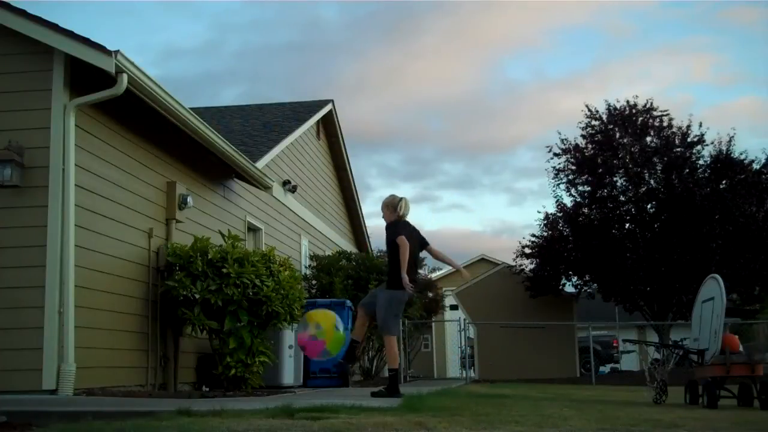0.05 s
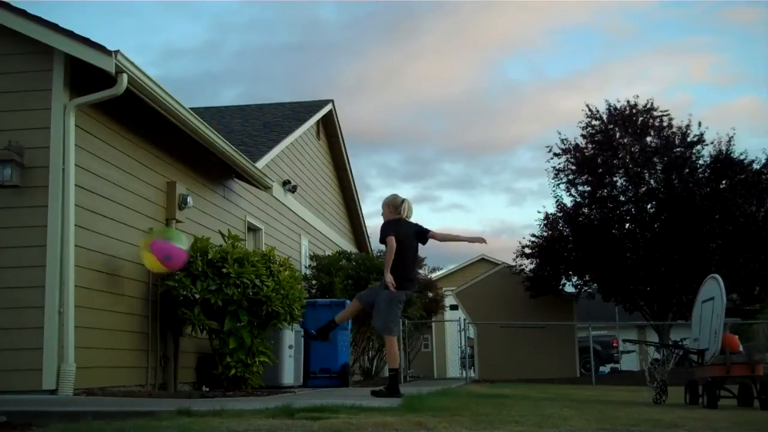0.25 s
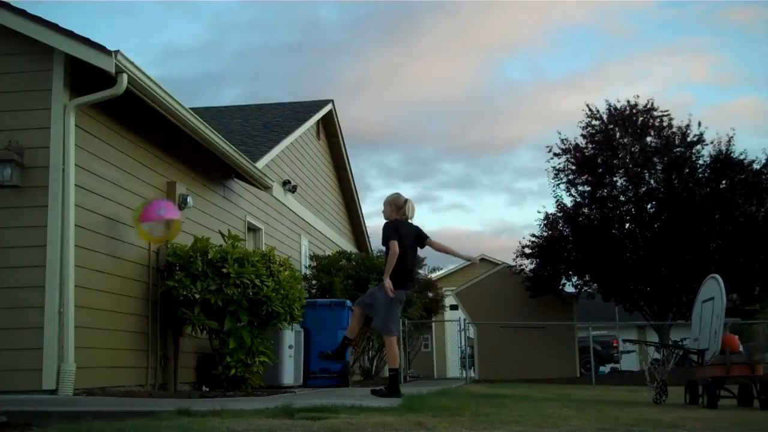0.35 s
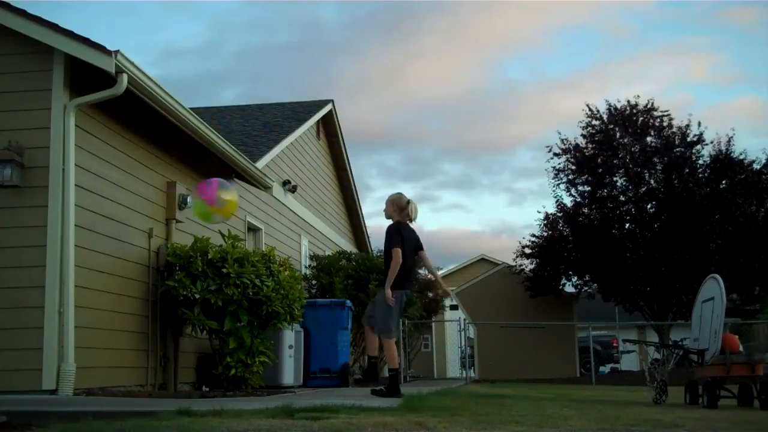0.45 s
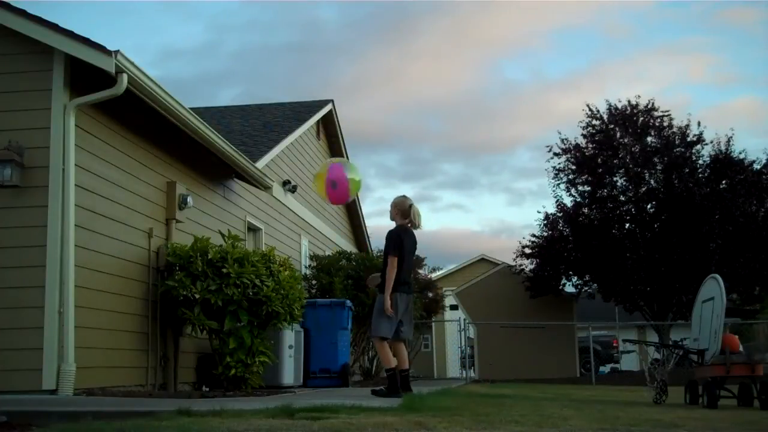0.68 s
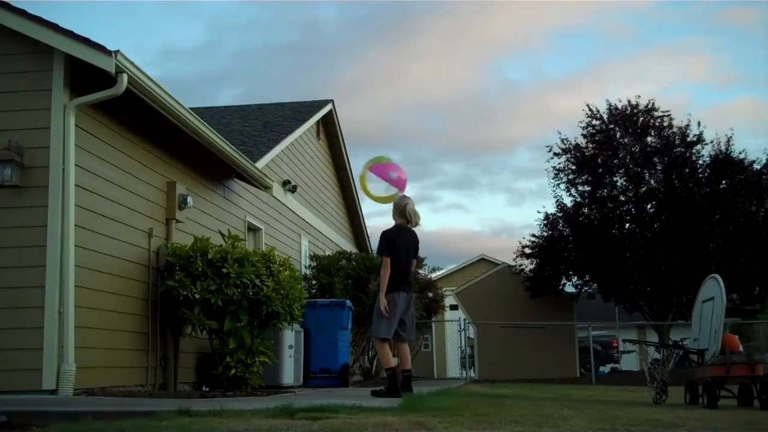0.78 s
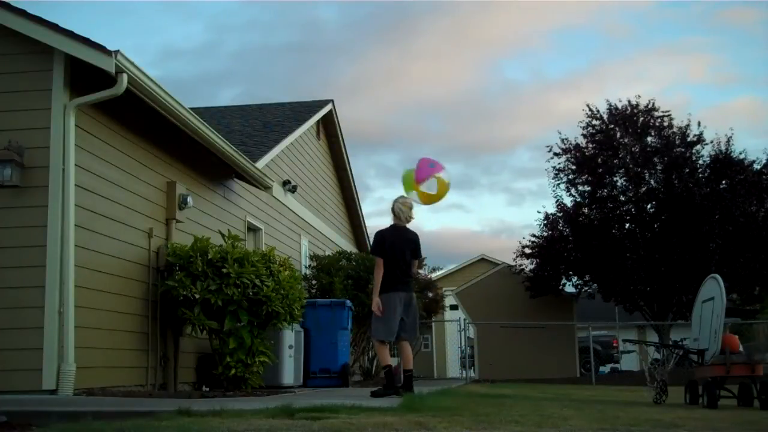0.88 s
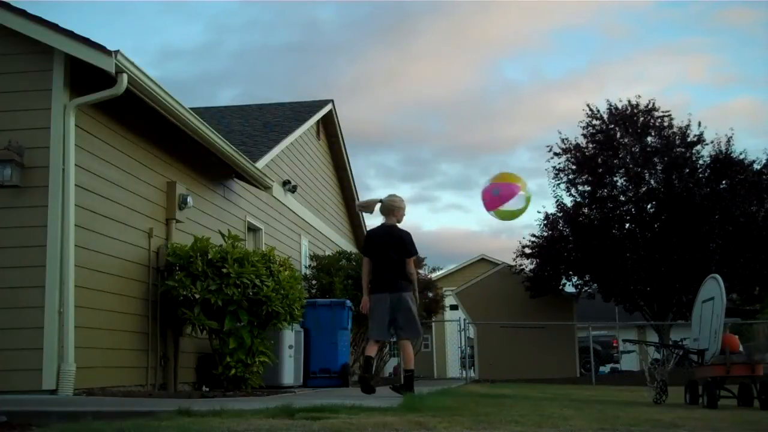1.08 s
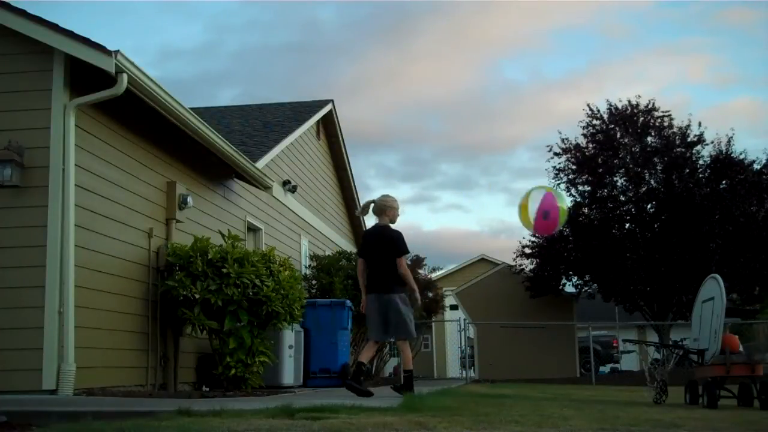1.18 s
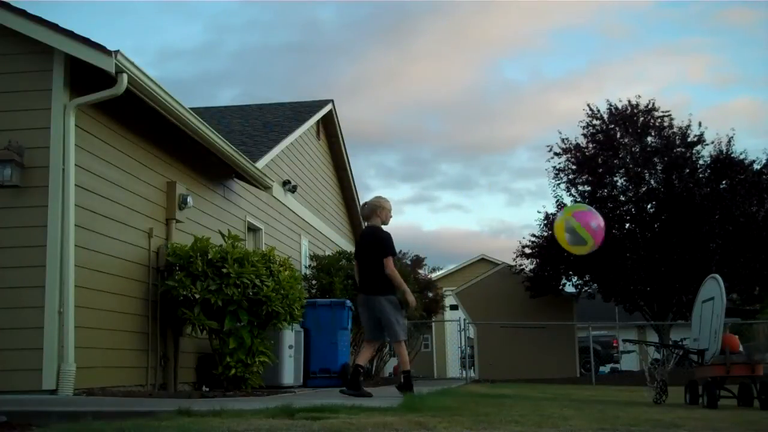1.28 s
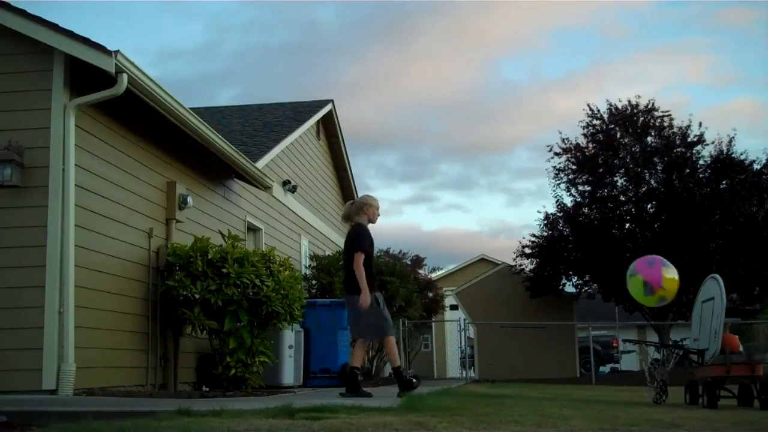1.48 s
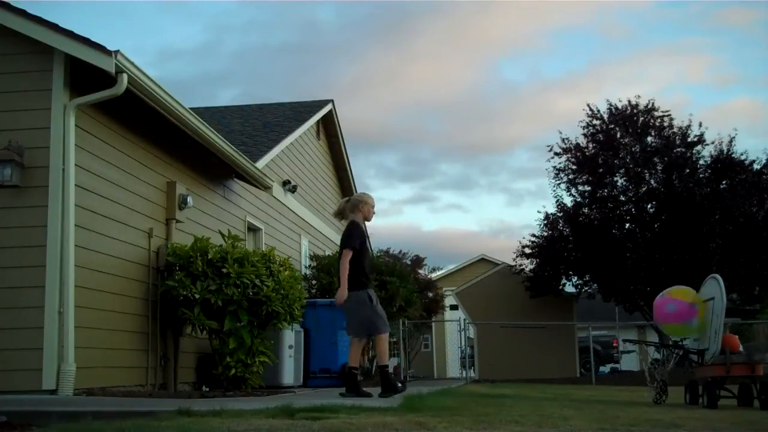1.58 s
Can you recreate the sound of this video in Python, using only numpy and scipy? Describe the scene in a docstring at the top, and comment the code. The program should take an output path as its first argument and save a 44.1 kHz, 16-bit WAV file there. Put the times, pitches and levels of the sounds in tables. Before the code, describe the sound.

A beach ball kicked with a sharp slap, then hitting house siding in a quiet yard.

```python
"""A light inflated plastic ball is kicked against the siding of a house in a quiet yard.
The foot gives one short slap and a thump; at the wall the skin crumples and snaps back while the air inside rings.
The yard answers with a bright tail and one echo, shoes brush the ground, and a faint hum lies under the outdoor air."""
import sys
import numpy as np
from scipy import signal
from scipy.fft import rfft, irfft, next_fast_len
from scipy.io import wavfile
from scipy.ndimage import map_coordinates

SR = 44100
rng = np.random.default_rng(int(sys.argv[2]) if len(sys.argv) > 2 else 0)


def log_audio(samples):
    """Write samples as a 16-bit WAV file to the path given in sys.argv[1]."""
    # one column per channel
    frames = np.atleast_2d(samples).T
    # limit to full scale, then quantise
    limited = np.clip(frames, -1, 1)
    pcm = np.round(limited * 32767).astype(np.int16)
    wavfile.write(sys.argv[1], SR, pcm)


N = 72765

# the foot strikes; the ball meets the wall; how long it stays there (s)
KICK_S, WALL_S, CONTACT_S = .2166, .4447, .0227  # fixed
# the taut skin under the foot (Hz, dB, t60 s)
SKIN = [(790, -21.5, 0.019), (1783, -29, 0.017), (4260, -8, 0.0048), (6216, -8, 0.0043), (7450, -9.5, 0.00644)]
# the air inside the ball (Hz, dB, t60 s)
CAVITY = [(405, -8, 0.07), (608.9, -11.5, 0.09), (689, -5.5, 0.11), (771.6, -3, 0.06), (909, 0.5, 0.067), (999, -6.5, 0.029), (1081, 1, .075),
          (1233, -13, 0.08), (1492, -9, 0.07), (1575, -14, .07), (1733, -8, 0.07), (1945, -6, 0.065), (2140, -6.5, 0.057), (2554, -2, 0.04)]
# the snap as the skin springs free of the wall
RELEASE_DB = -6  # fixed
# sharp folds of the skin as it flattens (s, dB)
SNAPS = [(0.4437, -17.5), (0.4467, -6.5), (0.4487, -8), (0.4512, -14.5), (0.4543, -11.5), (0.4572, -12.5)]
CRUMPLE_FADE_DB_PER_S = 384.5  # the crumpling eases as the ball slows
# hollow knocks of the ball on the siding (s, dB, Hz, t60 s)
KNOCKS = [(0.4493, -18, 1430, 0.0049), (0.4607, -9, 1130, 0.0073)]
# pushes of air from the ball and the siding (s, dB, Hz, t60 s)
THUMPS = [(0.2161, -15.5, 185, 0.017), (0.2285, -35.5, 150, 0.028), (0.4443, -33, 68, 0.089), (0.4517, -24.5, 170, 0.048), (0.4605, -23, 170, 0.053), (0.4654, -31.5, 66, 0.068)]
# the kicking foot lands (s)
STEP_S = .6595  # fixed
# shoes brushing the ground (s, rise s, hold s, t60 s, dB)
SCUFFS = [(0.663, 0.009, 0.052, 0.095, -44), (1.308, 0.022, 0.017, 0.17, -62.5), (1.524, 0.067, .06, .3, -56.5)]
# small ticks of grit underfoot (s, length s, dB)
TICKS = [(1.2998, 0.0053, -47.5), (1.3205, 0.00051, -60.5), (1.328, 0.00049, -51)]
# spectra (Hz, dB per Hz)
SLAP = [(100, -9), (600, -6), (1000, -7.5), (1700, -4.5), (2600, -8), (4000, -0.5), (5200, -5), (7300, 0), (9500, -10.5), (14000, -28.5)]
CRUMPLE = [(60, -9.5), (200, -7.5), (520, -18.5), (1000, -4.5), (2600, -4), (3700, -5), (5000, -3), (6300, -0.5), (7500, -0.5), (9500, -11), (14000, -27.5)]
SNAP = [(200, -6), (520, -10.5), (1500, -6), (4000, -8), (7200, 4), (9500, -8.5), (14000, -26.5)]
SHOE = [(200, -14), (1200, -18.5), (2500, -10.5), (4500, -8.5), (7200, 3.5), (9500, -10.5), (14000, -24)]
SOLE = [(100, -1), (600, -4.5), (2200, 1), (3800, -3), (6000, -16), (14000, -32)]
ECHO = [(100, -2), (400, 3), (1000, -9.5), (2300, 7.5), (4500, 6), (7500, 7), (14000, -6.5)]
GRIT = [(300, -22), (2500, -17), (4500, -3), (5800, 1.5), (7400, 2), (9500, -18), (14000, -29.5)]
AIR = [(15, -42), (25, -11.5), (91, -9.5), (122, 0.5), (160, -12), (244, -5.5), (278, -7.5), (584, -14), (632, -10.5),
       (868, -7.5), (1360, -13.5), (1920, -15), (14000, -26.5)]
# steady tones: mains hum and a thin whine (Hz, dB)
HUM = [(119, -71), (194, -72.5), (245, -70), (7870, -74.5)]
YARD_T60 = [(80, 0.38), (300, 0.23), (1000, 0.53), (2500, 0.38), (7000, 0.54), (13000, 0.53)]  # (Hz, s)
YARD_DB = [(80, -13), (400, -14), (1200, -9.5), (2500, -13.5), (4500, -8), (6200, -12.5), (7600, -7.5), (10000, -10), (14000, -15.5)]
NEAR_T60, NEAR_DB, NEAR_DELAY_S = 0.14, -7.5, 0.0042  # scatter from siding, eaves and shrubs
BALANCE_DB = [(100, 1), (700, 0.5), (1150, -3), (1600, 10.5), (2400, 9.5), (4100, 5.5), (7000, 13), (9000, 0), (13000, 11)]
AIR_BALANCE = [(100, 1.5), (1000, 1.5), (2200, 5.5), (7000, 4.5), (8500, 0.5), (14000, 1.5)]  # (Hz, left minus right dB)
AIR_ALIKE = [(60, 0.025), (130, 0.91), (280, 0.85), (620, 0.58), (1350, 0.38), (2930, -0.17), (6390, -0.1),
             (13900, -0.024)]  # (Hz, left-right likeness)
YARD_ALIKE = [(100, 0.98), (600, 0.868), (1400, 0.386), (3000, 0.29), (12000, 0.24)]  # (Hz, left-right likeness)
# the answer from across the yard: its delay and level
ECHO_S = .0932  # fixed
ECHO_DB = -29.5
CLIP_TOP, LOW_CUT_HZ = 1.05, 45
TOP_HZ = 14400  # fixed
T = np.arange(N) / SR


def amp(db):
    return 10 ** (np.asarray(db) / 20)


def unit(x):
    return x / np.sqrt(np.mean(x ** 2) + 1e-20)


def along(points, hz):
    """(Hz, value) points on a log axis."""
    f, v = np.transpose(points)
    return np.interp(np.log(hz + 1), np.log(f + 1), v)


def filtered(x, response):
    """x times a response of frequency."""
    m = 2 * next_fast_len(N)
    return irfft(rfft(x, m) * response(np.fft.rfftfreq(m, 1 / SR)), m)[..., :N]


def coloured(x, spectrum):
    """Causal colouring that keeps the power of white noise."""
    def response(hz):
        c = irfft(np.log(unit(amp(along(spectrum, hz))) + 1e-6))  # fixed
        c[1:len(c) // 2] *= 2
        c[len(c) // 2 + 1:] = 0
        return np.exp(rfft(c))
    return filtered(x, response)


def spread(pair, alike):
    """Two unrelated signals mixed to a given left-right likeness."""
    turn = lambda hz: np.arccos(np.clip(along(alike, hz), -1, 1)) / 2
    mid, side = filtered(pair, lambda hz: np.array([np.cos(turn(hz)), np.sin(turn(hz))]))
    return np.array([mid + side, mid - side])


def leaning(x, balance):
    """Each frequency leans to one side."""
    return filtered(x, lambda hz: amp(np.outer([.5, -.5], along(balance, hz))))


def envelope(s, rise, hold, t60):
    """Straight rise, hold, exponential fall."""
    return np.clip((T - s) / rise, 0, 1) * amp(-60 * np.maximum(T - s - rise - hold, 0) / t60)  # fixed


def wobble(rate):
    """A smooth random curve, rate knots a second."""
    return map_coordinates(rng.standard_normal(int(N * rate / SR) + 4), [T * rate])


def crackle(rough_db):
    """Dense tiny clicks whose size changes from instant to instant."""
    return unit(rng.choice([-1, 1], N) * amp(rough_db * wobble(1500)))  # fixed


def tone(s, hz):
    return np.sin(2 * np.pi * hz * (T - s))


def kick():
    """The foot slaps the skin, which rings for a few milliseconds; the air inside barely sounds."""
    slap = coloured(crackle(rough_db=0.5) * envelope(KICK_S, 0.00023, 0.00099, 0.0065), SLAP)
    skin = sum(amp(db) * tone(KICK_S, hz) * envelope(KICK_S, 0.00065, 0.00026, t60) for hz, db, t60 in SKIN)
    return amp(-15.5) * slap + amp(-5.5) * skin + amp(-42.5) * cavity(KICK_S, rise=0.0025, hold=0.0034)


def cavity(s, rise, hold):
    """The enclosed air rings while the skin drives it, then dies away."""
    return sum(amp(db + rng.normal(0, 1)) * tone(rng.random(), hz) * envelope(s, rise, hold, t60) for hz, db, t60 in CAVITY)


def wall_hit():
    """The skin crumples all through the contact, most at first, drives the air inside, and snaps as it springs free."""
    effort = envelope(WALL_S, 0.00157, CONTACT_S, 0.019) * amp(-CRUMPLE_FADE_DB_PER_S * np.clip(T - WALL_S, 0, CONTACT_S))
    crumple = coloured(crackle(rough_db=4.5) * effort, CRUMPLE)  # fixed
    folds = sum(amp(db) * envelope(s, .0001, 0.000253, 0.0033) for s, db in SNAPS)
    release = amp(RELEASE_DB) * envelope(WALL_S + CONTACT_S, .0001, .0003, .003)  # fixed
    snaps = coloured(crackle(rough_db=1.5) * (folds + release), SNAP)
    knocks = sum(amp(db) * tone(s, hz) * envelope(s, 0.00038, 0, t60) for s, db, hz, t60 in KNOCKS)
    return amp(-15.0) * crumple + snaps + knocks + amp(-27.5) * cavity(WALL_S, rise=0.007, hold=0.013)


def thumps():
    """Each squeeze of the ball gives a low, quickly damped push; the kick's push comes back once, weaker,
    moments later."""
    return -sum(amp(db) * tone(s, hz) * envelope(s, 0.00072, 0, t60) for s, db, hz, t60 in THUMPS)


def shoes():
    """Soles brush the ground and shift a little grit."""
    brush = crackle(rough_db=3) * sum(amp(db) * envelope(s, rise, hold, t60) for s, rise, hold, t60, db in SCUFFS)
    grit = crackle(rough_db=-3.5) * sum(amp(db) * envelope(s, 0.00029, length, 0.0057) for s, length, db in TICKS)
    return coloured(brush, SHOE) + coloured(grit, GRIT)


def yard(x, near_db, far_db):
    """The direct sound, dense scatter from close by, and a longer, bright tail."""
    hz, t, z = signal.stft(rng.standard_normal((2, N)), SR, nperseg=256)
    far = signal.istft(z * amp(-60 * t / along(YARD_T60, hz)[:, None]), SR, nperseg=256)[1][:, :N]  # fixed
    far = far * envelope(0.0041, 0.027, 2, 1)
    far = filtered(far / np.linalg.norm(far[0]), lambda f: amp(along(YARD_DB, f)))
    near = rng.standard_normal((2, N)) * envelope(NEAR_DELAY_S, 0.00023, 0, NEAR_T60)
    answer = amp(far_db) * far + amp(NEAR_DB + near_db) * near / np.linalg.norm(near[0])
    return x + signal.fftconvolve(x[None], spread(answer, YARD_ALIKE), axes=1)[:, :N]


def outdoors():
    """Distant air with a slightly wavering hum."""
    air = unit(spread(coloured(rng.standard_normal((2, N)), AIR), AIR_ALIKE))
    hum = sum(amp(db) * np.sqrt(2) * np.sin(2 * np.pi * hz * T + 0.56 * wobble(9.07)) for hz, db in HUM)
    return amp(-56.0) * leaning(air, AIR_BALANCE) + hum


def slap():
    """The foot meets the ball with one broad, sharp click."""
    return amp(-5) * coloured(1. * (np.arange(N) == round(KICK_S * SR)), SLAP)


def kicked_skin():
    """The skin buzzes and rings for a few milliseconds."""
    buzz = coloured(crackle(rough_db=1.0) * envelope(KICK_S, 0.00015, 0.0013, 0.0065), SLAP)
    ring = sum(amp(db) * tone(KICK_S, hz) * envelope(KICK_S, 0.0005, 0.00019, t60) for hz, db, t60 in SKIN)
    return amp(-17.5) * buzz + amp(-5.0) * ring


def footfall():
    """The kicking foot comes down with a light tap and a soft thud."""
    tap = coloured(crackle(rough_db=1) * envelope(STEP_S, 0.0015, 0.0039, 0.075), SOLE)
    thud = tone(STEP_S, 69.5) * envelope(STEP_S, 0.0028, 0.0082, 0.14)
    return amp(-50) * tap + amp(-53) * thud


def echo(x):
    """A building across the yard sends back one slightly smeared copy."""
    smear = spread(rng.standard_normal((2, N)), YARD_ALIKE) * envelope(ECHO_S, 0.0011, 0.00068, .015)
    return signal.fftconvolve(coloured(x, ECHO)[None], amp(ECHO_DB) * smear / np.linalg.norm(smear[0]), axes=1)[:, :N]


def scene():
    click, skin, wall, low = slap(), kicked_skin(), wall_hit(), thumps()
    kick = yard(click, near_db=10.5, far_db=4.0) + yard(skin, near_db=-5.5, far_db=-12)
    hits = kick + yard(wall, near_db=-2.5, far_db=-6.5) + yard(low, near_db=-3, far_db=0.5) + echo(click + skin + wall + low)
    return leaning(hits + yard(shoes() + footfall(), near_db=-2.5, far_db=-3), BALANCE_DB) + outdoors()


def record(dry):
    """The loudest peaks clip; the microphone thins the deepest bass, and nothing is kept above the band limit."""
    clipped = dry / (1 + np.abs(dry / CLIP_TOP) ** 6) ** (1 / 6)  # fixed
    thinned = signal.sosfilt(signal.butter(2, LOW_CUT_HZ, 'highpass', fs=SR, output='sos'), clipped)
    return filtered(thinned, lambda hz: np.clip((TOP_HZ - hz) / 300 + .5, 0, 1))  # fixed


dry = scene()
out = record(dry)
log_audio(out)
```